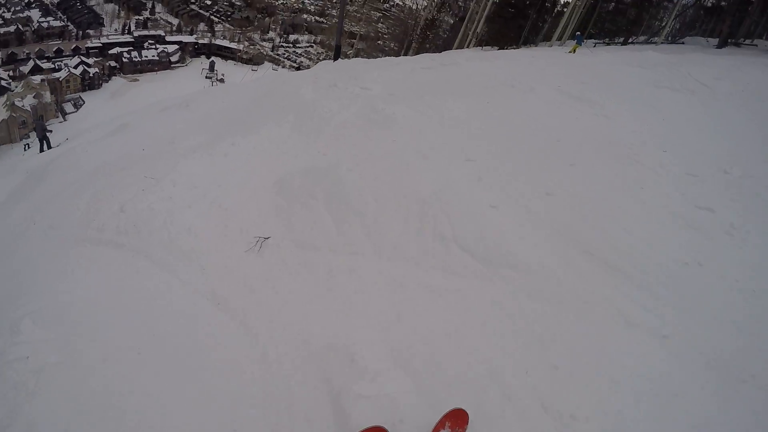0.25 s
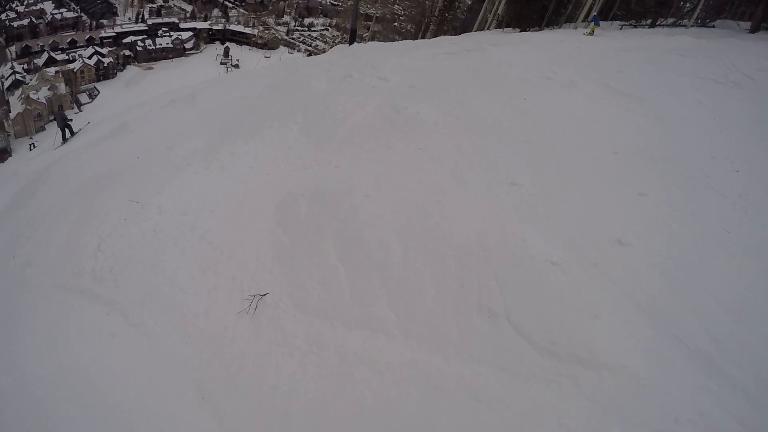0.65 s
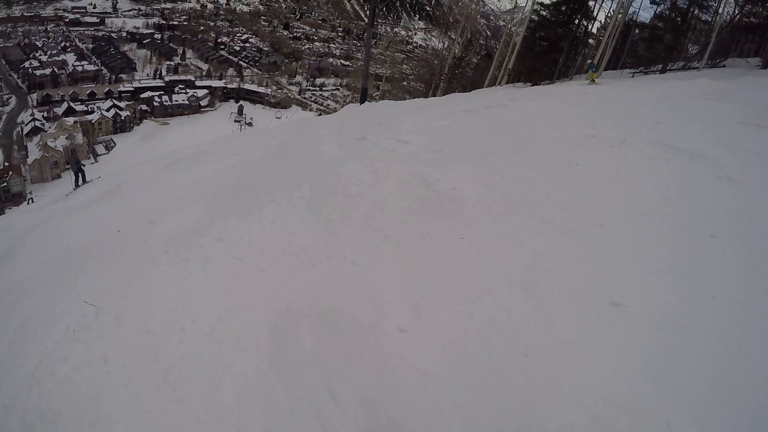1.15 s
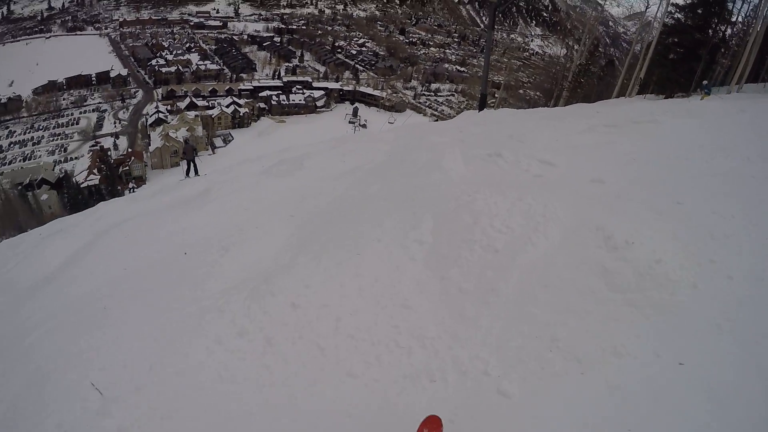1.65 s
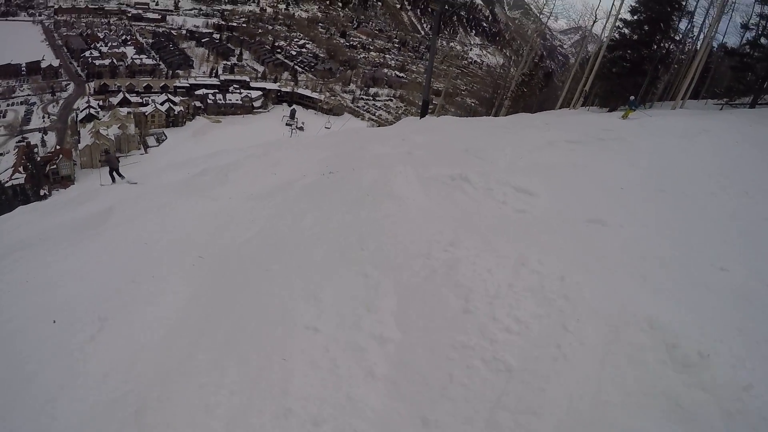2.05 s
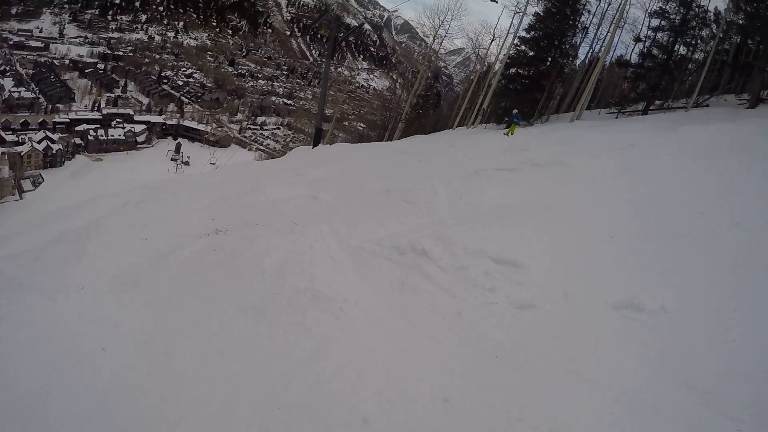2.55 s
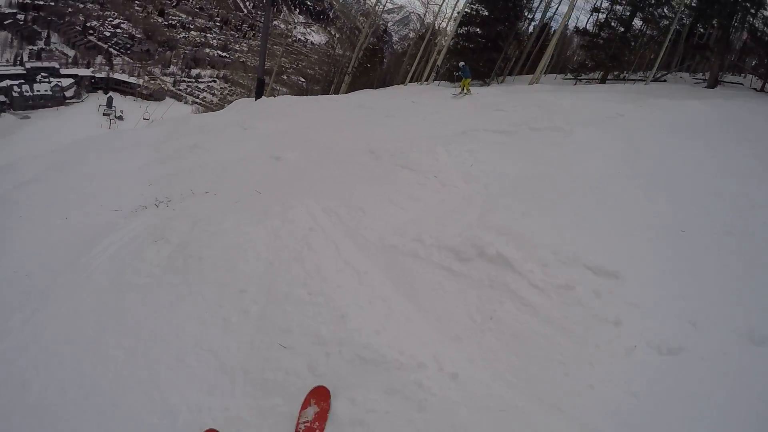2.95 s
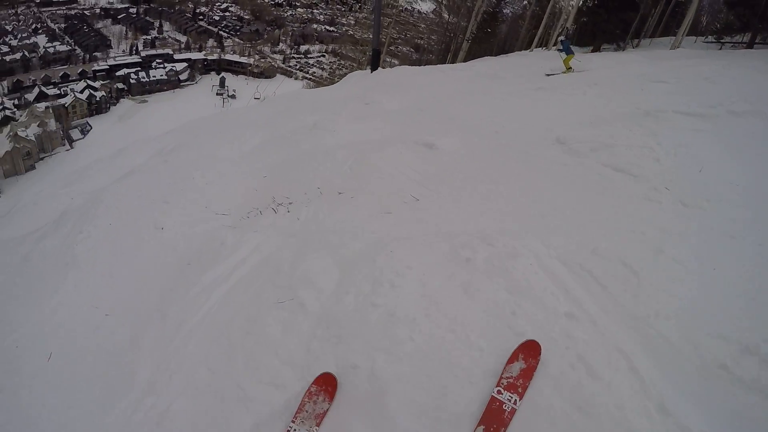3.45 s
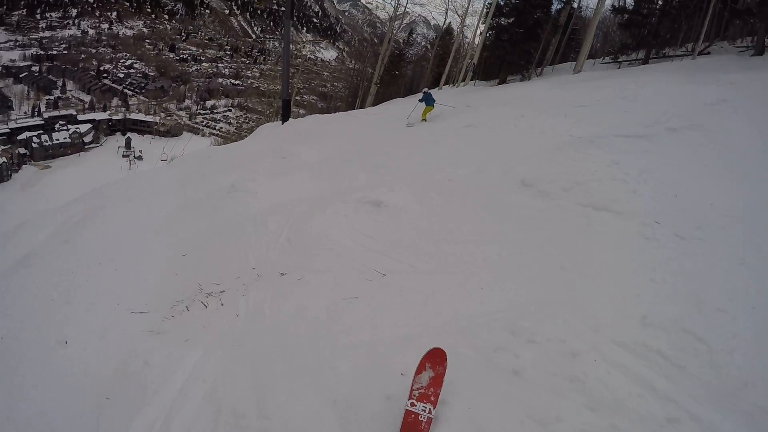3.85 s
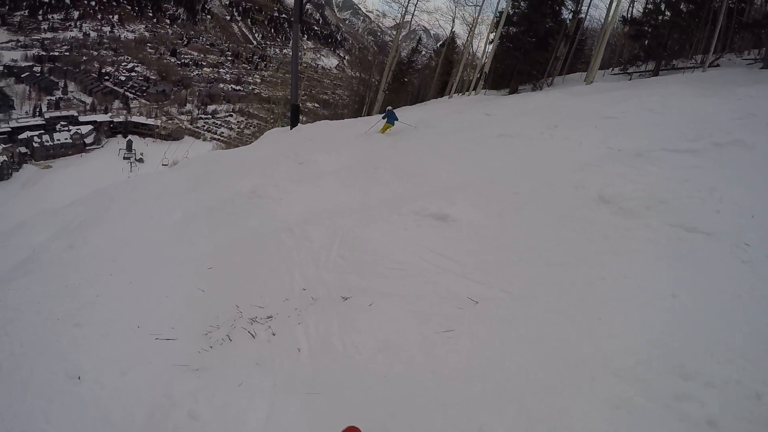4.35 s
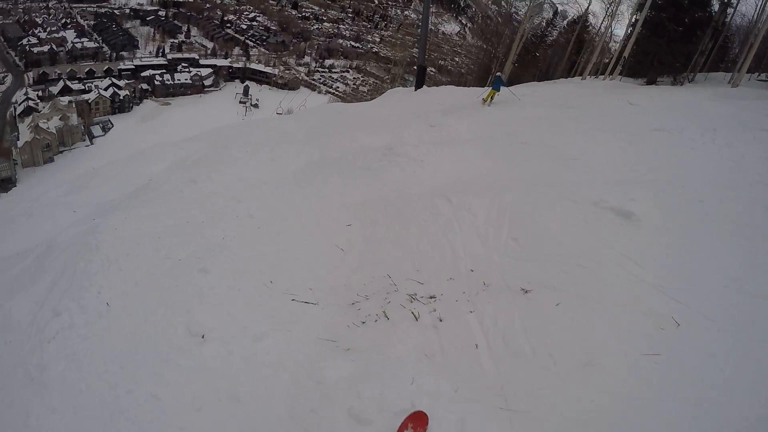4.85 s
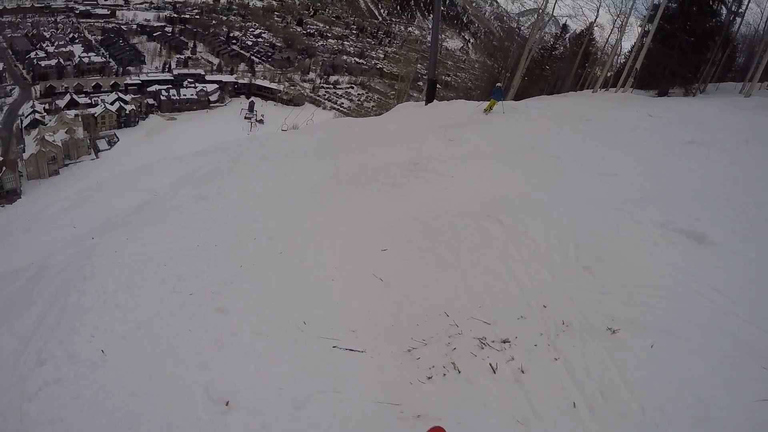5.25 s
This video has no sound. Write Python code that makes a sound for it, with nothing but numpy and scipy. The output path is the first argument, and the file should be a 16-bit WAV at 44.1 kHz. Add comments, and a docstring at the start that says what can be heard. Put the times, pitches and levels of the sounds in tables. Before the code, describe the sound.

Skis slide and scrape over packed snow, heard close from a cased camera worn by the skier, with low wind rumbling on the microphone throughout. It opens with a short rasp, an edge hiss and a cluster of dull knocks around 0.2 seconds. The sliding softens from about 0.5 to 1 second, then returns in short grainy pushes. Faint, brief low hums slide in pitch near 0.5 and 1.7 seconds, with a clearer one at 2.3. After a tiny lull, muffled knocks at 2.6 seconds lead into the strongest scraping, and the wind peaks in a gust around 3 seconds. Bright hiss swells near 3.5 seconds, with crusty rasps just before 4. The loudest dull knock lands at about 4.1 seconds, followed by another scraping turn and more gusts. A thin airy hiss joins near 5 seconds as the skis ease off toward 5.5.

```python
"""On a slope of packed snow, a skier carves a run of turns wearing a camera in a plastic case.
Friction and breaking crystals at the edges give scrape, hiss and spray, with short rasps and singing
bands, over the even rush of the bases. Eddies shed by the case rumble and buffet, and air rushes over
its seams; its resonances colour the noise. Jolts arrive through the mount as dull, dispersed knocks,
and a few brief low hums slide in pitch."""
import sys
import numpy as np
from scipy import signal
from scipy.fft import rfft, irfft, next_fast_len
from scipy.io import wavfile
from scipy.ndimage import uniform_filter1d, map_coordinates

SR = 44100
rng = np.random.default_rng(int(sys.argv[2]) if len(sys.argv) > 2 else 0)


def dump_mix(stems):
    """Bounce the given channels to the path in sys.argv[1] as a 16-bit WAV at rate SR."""
    frames = np.atleast_2d(stems).T  # one column per channel
    limited = np.clip(frames, -1, 1)  # hard clip at full scale
    pcm = np.round(limited * 32767).astype(np.int16)
    wavfile.write(sys.argv[1], SR, pcm)


N = 242550
TIME = np.arange(N) / SR

# Resonances and hollows of the case. Each row: centre in Hz, half-width in Hz, gain in dB.
CASE_RESONANCES = [(346, 54, 1.5), (574, 21, 3), (995, 47, -6.5), (1110, 49, 3.5), (1840, 102, 4),
                   (2555, 78, 2), (2990, 50, 2.5), (3490, 75, -1.5), (3990, 220, 4.5), (4530, 55, -6),
                   (5000, 180, 1.5), (5120, 310, -7), (5960, 446, 8), (7080, 160, -3), (8160, 180, -1.5),
                   (9700, 200, -1.5), (10100, 260, 3.5), (12500, 430, -4)]
# Running friction of the skis. Each row: time in seconds, level in dB before each layer's share.
RUNNING_FRICTION = [(0, -50.5), (.4, -53), (.62, -59), (.88, -60), (1.05, -55), (2.48, -54.5), (3.0, -48.5),
                    (3.3, -51), (3.75, -48.5), (4.25, -53), (4.9, -52), (5.5, -57.5)]
# Pushes of the edges into the snow. Each row: start in seconds, length in seconds, scrape level in dB,
# hiss relative to scrape in dB, spray relative to scrape in dB.
EDGE_SKIDS = [(0.0, 0.23, -51.5, -6.5, -12), (.19, .2, -51, -2, -8.5), (0.592, 0.036, -52, -21, -24),
              (0.757, 0.16, -56, -31, -32), (1.07, 0.089, -54, -21, -12), (1.2, 0.31, -50.5, -2, -16),
              (1.342, 0.13, -52, 0, -12), (1.63, .24, -51, -2.5, -23), (1.952, 0.21, -53.5, 3, -6.5),
              (2.28, 0.033, -51.5, -5, -18), (2.555, 0.72, -47.5, -4, -16), (2.794, 0.095, -44, -8, -12),
              (2.92, .15, -43.5, -5, -18), (3.13, 0.077, -51, 4, -13), (3.357, 0.12, -45.5, 2.5, -10.5),
              (3.52, 0.13, -48.5, -1.5, -15), (3.846, 0.065, -48, 2, -7), (3.95, 0.27, -50.5, 3.5, -16),
              (4.228, 0.39, -47, -4, -33), (4.315, 0.12, -44.5, -4, -10.5), (4.609, 0.46, -49.5, -4.5, -25),
              (4.925, 0.092, -50, -1, -9.5), (5.116, 0.21, -54.5, -1, -29), (5.376, .12, -52.5, -6, -24)]

# Source spectra, before the case colours them. Each row: frequency in Hz, relative density in dB.
SCRAPE_SPECTRUM = [(100, -32), (400, -12), (850, -8), (1200, 0.5), (2000, 4), (2900, -1), (4200, -24),
                   (7000, -15.5), (15000, -47)]
HISS_SPECTRUM = [(500, -47), (1800, -2.5), (3000, 0), (3800, 4), (4600, -0.5), (6300, -11), (7500, -25),
                 (10000, -32.5), (15000, -64)]
SPRAY_SPECTRUM = [(1000, -28), (4000, 2), (7500, 1.5), (9000, 0.5), (11000, -4.5), (14000, -7),
                  (15300, -15)]
GLIDE_SPECTRUM = [(200, 7), (500, -1.5), (800, -1.5), (1300, -7.5), (3000, -9.5), (5000, -12.5),
                  (8000, -23), (12000, -19), (15000, -21)]
RUMBLE_SPECTRUM = [(5, -23), (14, -10.5), (24, -8.5), (34, 2.5), (45, -5.5), (62, -12.5), (85, -24.5),
                   (150, -34.5), (400, -85)]
BUFFET_SPECTRUM = [(30, -40), (70, 5), (130, 3.5), (200, -4.5), (260, -10.5), (340, -15.5), (450, -22.5),
                   (700, -44.5), (1500, -27.5), (5000, -85)]
SEAM_SPECTRUM = [(600, -29), (1400, -23.5), (1850, 10), (2500, -3), (3400, 8.5), (3900, 10), (4800, -24),
                 (6100, -40), (6900, -41), (7650, -3), (8400, -38), (15000, -52)]

# Airflow past the case. Each row: time in seconds, rumble level in dB.
AIRFLOW = [(0, -28.5), (.4, -30.5), (.75, -33.5), (1.2, -32), (1.35, -28), (2.4, -28), (3.0, -24.5),
           (3.5, -24.5), (4.1, -29), (4.8, -27), (5.5, -31.5)]
# Large eddies. Each row: peak time in seconds, rumble level in dB, half-width in seconds.
WIND_GUSTS = [(.22, -21.5, .07), (.42, -27, 0.077), (1.45, -26.5, 0.16), (1.93, -26, 0.13),
              (2.12, -21.5, 0.024), (2.69, -18.5, 0.099), (3.05, -12, 0.073), (3.23, -15.5, 0.044),
              (4.28, -16, 0.043), (4.41, -20.5, 0.035), (4.72, -21, 0.037), (5.03, -22, 0.049)]
# Bursts of small eddies. Each row: peak time in seconds, buffet level in dB, half-width in seconds.
WIND_FLURRIES = [(.16, -42, 0.13), (.67, -42, 0.027), (.86, -38, 0.073), (1.33, -40.5, 0.077),
                 (1.8, -35, 0.15), (2.35, -33, 0.025), (2.65, -35, 0.084), (2.96, -40, 0.19),
                 (3.42, -40, 0.16), (3.89, -39, 0.032), (5.5, -40, 0.17)]
# Brief drops in the airflow. Each row: time in seconds, gain in dB, half-width in seconds.
WIND_LULLS = [(.74, -4.5, 0.12), (2.443, -11, 0.033), (3.777, -5.5, 0.052), (5.276, -12.5, 0.027)]
# An edge catching crust. Each row: peak time in seconds, level in dB, half-width in seconds.
CRUST_BITES = [(0.034, -41, 0.0098), (1.145, -49, 0.0054), (2.585, -43, .006), (2.844, -46, 0.015),
               (3.022, -55, .007), (3.879, -45.5, 0.035), (4.001, -44.5, .018)]
# A steep edge singing. Each row: peak time in seconds, level in dB, half-width in seconds,
# band centre in Hz, band half-width in Hz.
SINGING_BANDS = [(0.037, -45, 0.018, 1160, 226), (.33, -55, 0.094, 2920, 700), (0.84, -61, 0.13, 800, 300),
                 (0.847, -55, 0.076, 2000, 450), (1.41, -49.5, 0.07, 3980, 250),
                 (1.414, -58, 0.069, 4750, 200), (2.744, -54, 0.19, 2900, 330),
                 (2.88, -58, 0.057, 6100, 600), (3.155, -50.5, 0.098, 3100, 400),
                 (3.475, -59, 0.15, 6350, 550), (3.487, -50, 0.14, 2660, 317),
                 (4.486, -58, 0.055, 810, 200), (5.46, -58, 0.077, 714, 300)]
# Jolts through the mount. Each row: time in seconds, peak in dB, cutoff in Hz, hardness from 0 to 1.
MOUNT_JOLTS = [(0.069, -24, 186, .01), (.091, -26.5, 170, 0.02), (.168, -14.5, 291, 0.01),
               (0.228, -26, 248, 0), (0.393, -35.5, 221, 0.04), (1.588, -40, 380, 0.07),
               (1.814, -30, 220, 0.02), (2.601, -17.5, 165, 0.01), (2.638, -19, 143, 0),
               (2.701, -33, 170, 0.03), (2.752, -29.5, 216, 0), (3.014, -29.5, 284, 0.11),
               (3.208, -30, 201, 0.02), (4.082, -9, 285, 0.03), (5.148, -38, 230, 0.01),
               (5.229, -34, 240, 0.01), (5.433, -33, 386, 0), (5.482, -36, 332, 0.1)]
# Modes of the case on its mount. Each row: frequency in Hz, bandwidth in Hz, relative strength.
MOUNT_MODES = [(159, 49, 0.81), (364, 49, 2.3), (565, 56, 4.3), (920, 64, 1.8)]
# Low hums. Each row: start in seconds, length in seconds, level in dB, first and target pitch in Hz.
SLIDING_HUMS = [(.5, .18, -41.5, 235, 129.4), (1.66, 0.079, -40, 140, 200.3), (1.77, .14, -38, 369, 117.7),
                (2.305, 0.088, -28.5, 130, 132.6)]
# Air over the seams. Each row: peak time in seconds, level in dB, half-width in seconds.
SEAM_DRAUGHTS = [(1.79, -50.5, 0.2), (4.98, -50, 0.57)]


def amp(db):
    """Amplitude grows tenfold for every 20 dB."""
    return 10 ** (np.asarray(db) / 20)


def unit(x):
    """Normalisation to an rms of 1."""
    return x / np.sqrt(np.mean(x ** 2) + 1e-20)


def bell(x, centre, half_width):
    """A Gaussian, falling to 1/e at half_width from its centre."""
    return np.exp(-((x - centre) / half_width) ** 2)


def swells(rows):
    """Incoherent swells add by power; the result is their joint gain."""
    return np.sqrt(sum((amp(db) * bell(TIME, peak, width)) ** 2 for peak, db, width in rows))


def curve(rows):
    """Linear interpolation of timed values, one result a sample."""
    return np.interp(TIME, *np.transpose(rows))


def wobble(rate):
    """Smooth random modulation: a spline through rate knots a second."""
    return map_coordinates(rng.standard_normal(N // 20), [TIME * rate + 2])


def filtered(x, response):
    """Linear filtering multiplies the spectrum by a frequency response."""
    size = next_fast_len(N + SR // 2)
    return irfft(rfft(x, size) * response(np.fft.rfftfreq(size, 1 / SR)), size)[:N]


def through_case(x, spectrum):
    """Source and filter: x takes a source spectrum, then the resonances of the case, at rms 1."""
    knots_hz, knots_db = np.transpose(spectrum)

    def response(hz):
        source_db = np.interp(np.log(hz + 1), np.log(knots_hz), knots_db)
        case_db = sum(db * bell(hz, centre, width) for centre, width, db in CASE_RESONANCES)
        return amp(source_db + case_db)
    return unit(filtered(x, response))


def snow(rate, spread_db, grain_share, drift_db=1.4):
    """Shot noise: crystals break at random, rate a second, over the smooth noise of friction."""
    cracks = (rng.random(N) < rate / SR) * rng.choice([-1, 1], N)
    cracks = cracks * amp(spread_db * np.clip(rng.standard_normal(N), -2, 2))
    noise = np.sqrt(grain_share) * unit(cracks) + np.sqrt(1 - grain_share) * rng.standard_normal(N)
    # The colour drifts with the ground, in patches of frequency and time.
    spectra = signal.stft(noise, nperseg=512)[2]
    patches = uniform_filter1d(rng.standard_normal(spectra.shape), size=5, axis=0)
    patches = uniform_filter1d(patches, size=22, axis=1)
    return signal.istft(spectra * amp(drift_db * unit(patches)), nperseg=512)[1][:N]


def skid(start, length, attack_s=0.057, release_s=0.052, sag_db_per_s=10.5):
    """The envelope of one push: the edge sets quickly, sags, and lets go with exponential decay."""
    age = np.maximum(TIME - start, 0)
    attack = np.minimum(age / attack_s, 1)
    release = np.exp(-np.maximum(age - length, 0) / release_s)
    return attack * amp(-sag_db_per_s * age) * release


def edge_gains(running_shares_db=(-4.5, -3, -9)):
    """Skids and running friction add by power, giving the gains of scrape, hiss and spray."""
    power = np.outer(amp(running_shares_db), amp(curve(RUNNING_FRICTION))) ** 2
    for start, length, db, hiss_db, spray_db in EDGE_SKIDS:
        power += np.outer(amp([db, db + hiss_db, db + spray_db]), skid(start, length)) ** 2
    return np.sqrt(power)


def edges(bumps_db=-0.7):
    """Edges shear the snow; bumps and chatter modulate the amplitude of all three layers together."""
    scrape_gain, hiss_gain, spray_gain = edge_gains() * amp(bumps_db * wobble(14))
    chatter = unit(wobble(28) + 3.4 * wobble(85))
    crunch = snow(rate=1700, spread_db=2.5, grain_share=0.39)
    shear = snow(rate=2800, spread_db=3.5, grain_share=0.58)
    powder = snow(rate=4000, spread_db=4.0, grain_share=0.27)
    scrape = scrape_gain * amp(1.05 * chatter) * through_case(crunch, SCRAPE_SPECTRUM)
    hiss = hiss_gain * amp(0.92 * chatter) * through_case(shear, HISS_SPECTRUM)
    spray = spray_gain * amp(0.57 * chatter) * through_case(powder, SPRAY_SPECTRUM)
    return scrape + hiss + spray


def glide(level_db=-63):
    """Sliding friction under the flat bases gives an even broadband rush."""
    return amp(level_db + 2.3 * wobble(9)) * through_case(rng.standard_normal(N), GLIDE_SPECTRUM)


def rumble(cutoff_hz=96, flutter_db=1.47):
    """Eddy shedding: large eddies roll off the case as low pressure fluctuations, swelling in gusts."""
    eddies = signal.hilbert(through_case(rng.standard_normal(N), RUMBLE_SPECTRUM))
    envelope = uniform_filter1d(np.abs(eddies), size=2200)
    levelled = unit(eddies.real / (envelope + .3))
    flow_gain = amp(curve(AIRFLOW) + flutter_db * wobble(9.3))
    pressure = np.hypot(flow_gain, swells(WIND_GUSTS)) * levelled
    return filtered(pressure, lambda hz: 1 / (1 + (hz / cutoff_hz) ** 6))


def buffet(base_db=-45.5, db_per_flow_db=0.19):
    """Small-scale turbulence beats on the case in lumpy flurries, over a bed that follows the flow."""
    flow_db = curve(AIRFLOW)
    bed_gain = amp(base_db + db_per_flow_db * (flow_db - flow_db.mean()))
    lumps = amp(2.3 * wobble(45))
    eddies = unit(lumps * through_case(rng.standard_normal(N), BUFFET_SPECTRUM))
    return np.hypot(bed_gain, swells(WIND_FLURRIES)) * eddies


def wind():
    """One airflow drives turbulence at both scales, so rumble and buffet drop together in a lull."""
    lull_db = sum(db * bell(TIME, centre, width) for centre, db, width in WIND_LULLS)
    return amp(lull_db) * (rumble() + buffet())


def bites():
    """A brief pulse of force excites a harsh broadband rasp where an edge catches crust."""
    force = sum(amp(db) * bell(TIME, peak, width) for peak, db, width in CRUST_BITES)
    crust = rng.standard_normal(N)
    return force * unit(through_case(crust, SCRAPE_SPECTRUM) + 1.3 * through_case(crust, HISS_SPECTRUM))


def singing():
    """Friction noise concentrates in a band while a steep edge is pressed hard."""
    out = np.zeros(N)
    for peak, db, width_s, centre_hz, width_hz in SINGING_BANDS:
        band = unit(filtered(rng.standard_normal(N), lambda hz: bell(hz, centre_hz, width_hz)))
        out += amp(db) * bell(TIME, peak, width_s) * band
    return out


def jolts(delay_s=0.00496, reference_hz=200, low_cut_hz=95):
    """Dispersion: bending waves carry the highs of each knock first, and the mount rings briefly."""
    size, lead = 8192, 400  # samples
    hz = np.fft.rfftfreq(size, 1 / SR)
    # The group delay is delay_s at reference_hz and falls as one over the root of frequency.
    travel = np.exp(-4j * np.pi * delay_s * np.sqrt(reference_hz * hz))
    mount = 1 + sum(gain * 1j * hz * width / (centre ** 2 - hz ** 2 + 1j * hz * width)
                    for centre, width, gain in MOUNT_MODES)
    out = np.zeros(N + size)
    for time, db, cutoff_hz, hardness in MOUNT_JOLTS:
        soft_push = hz ** 2 / (hz ** 2 + low_cut_hz ** 2) / (1 + (hz / cutoff_hz) ** 8)
        hard_contact = hardness * hz / (hz + cutoff_hz) / (1 + (hz / (3.45 * cutoff_hz)) ** 7)
        knock = np.roll(irfft((soft_push + hard_contact) * travel * mount), lead)
        out[round(time * SR) - lead:][:size] += amp(db) * knock / np.abs(knock).max()
    return out[:N]


def hums(time_constants=2.5):
    """Soft, wavering low tones swell and fade as their pitch relaxes exponentially towards a target."""
    out = np.zeros(N)
    for start, length, db, first_hz, target_hz in SLIDING_HUMS:
        progress = np.clip((TIME - start) / length, 0, 1)
        hz = target_hz + (first_hz - target_hz) * np.exp(-time_constants * progress)
        phase = 2 * np.pi * np.cumsum(hz * (1 + 0.042 * wobble(90))) / SR
        envelope = np.sin(np.pi * progress) * amp(db + 2.1 * wobble(95))
        out += envelope * np.sqrt(2) * np.sin(phase)
    return out


def draught():
    """Flow noise: air rushing over the seams of the case hisses in a few high bands."""
    return swells(SEAM_DRAUGHTS) * through_case(rng.standard_normal(N), SEAM_SPECTRUM)


def scene():
    """Superposition: the pressures of all sources add at the one microphone."""
    return (edges() + glide() + bites() + singing() + wind() + draught() + hums() + jolts())[None]


def record(dry):
    """Band limiting: the camera keeps nothing above its cutoff."""
    cutoff_hz = 15300
    return filtered(dry[0], lambda hz: hz < cutoff_hz)[None]


dry = scene()
out = record(dry)
dump_mix(out)
```